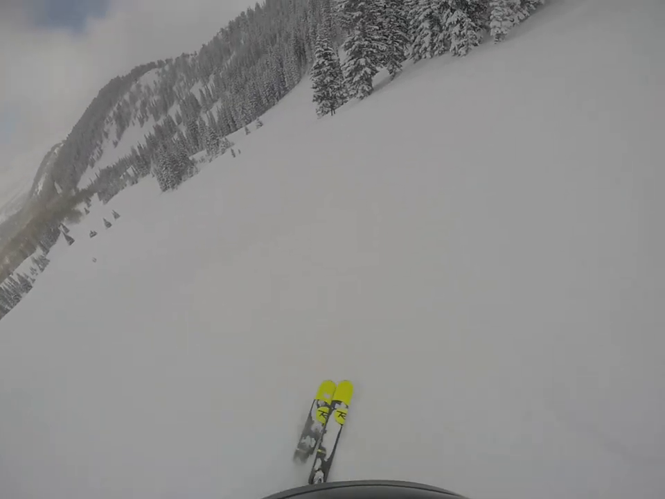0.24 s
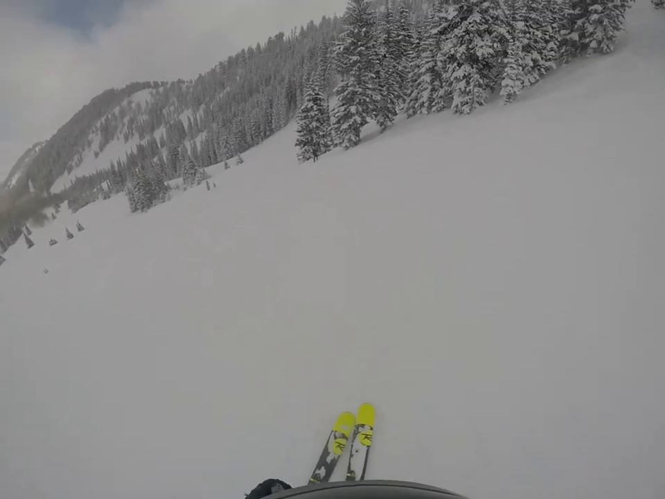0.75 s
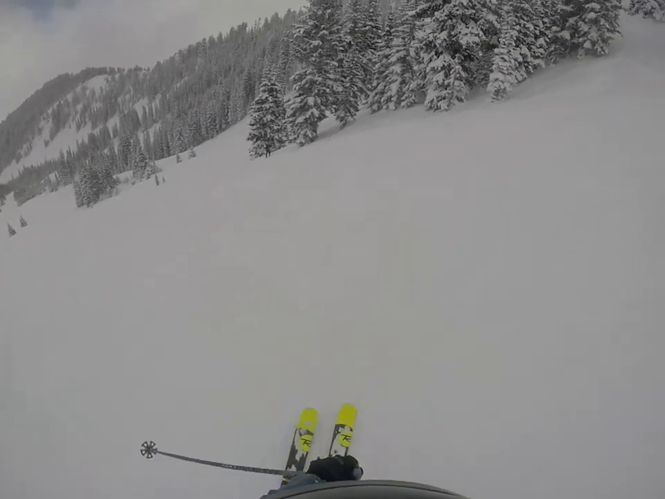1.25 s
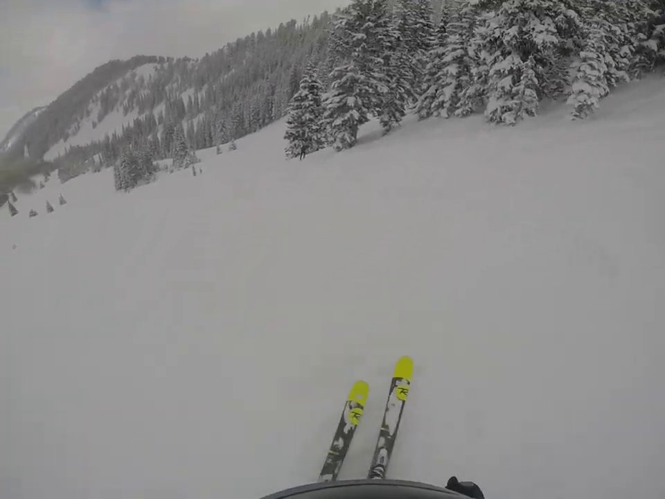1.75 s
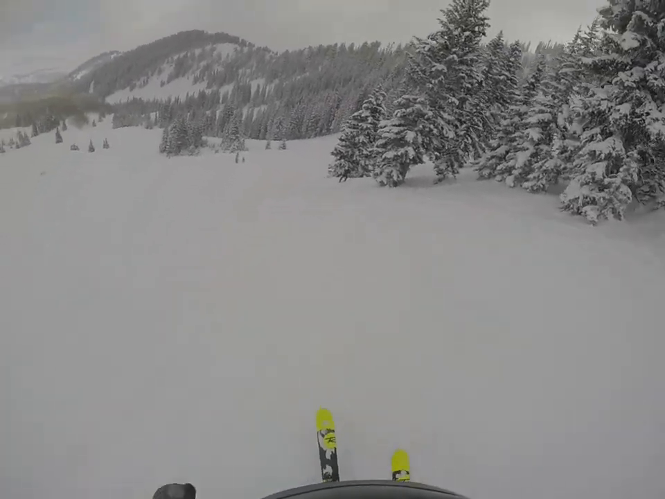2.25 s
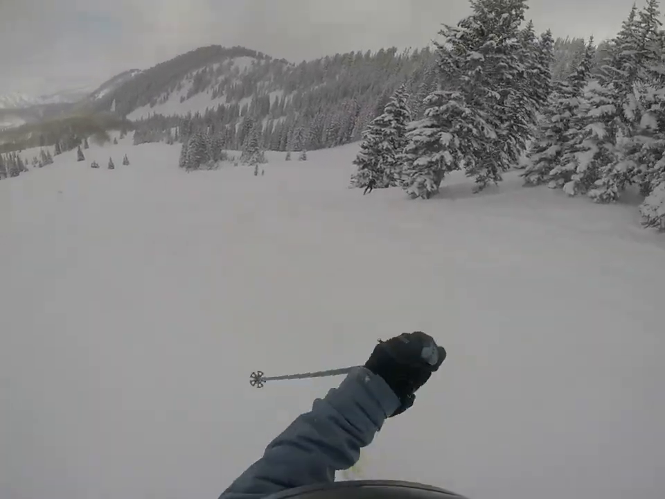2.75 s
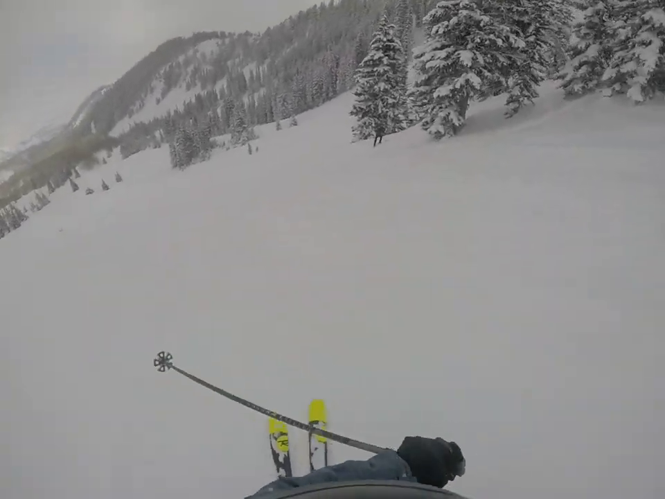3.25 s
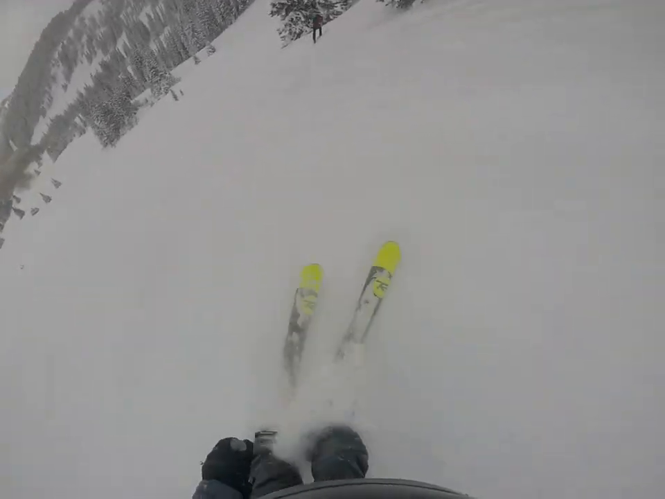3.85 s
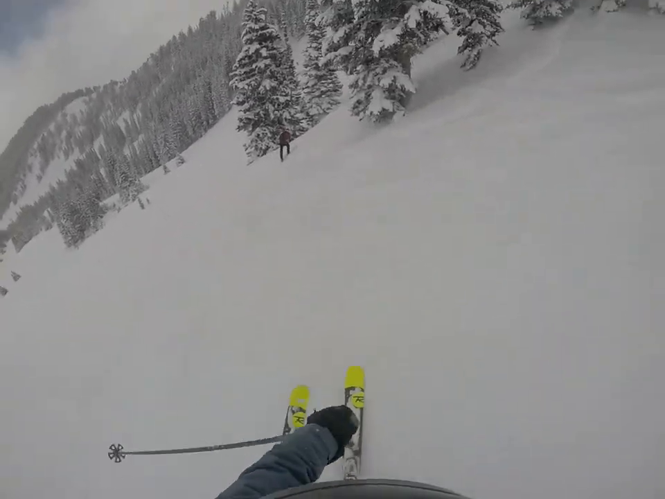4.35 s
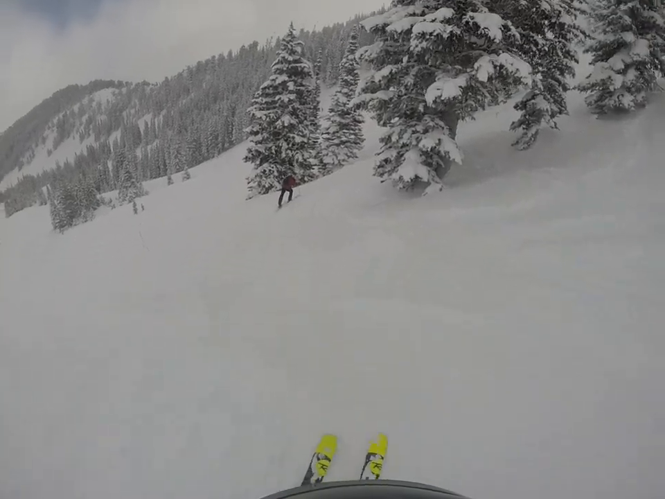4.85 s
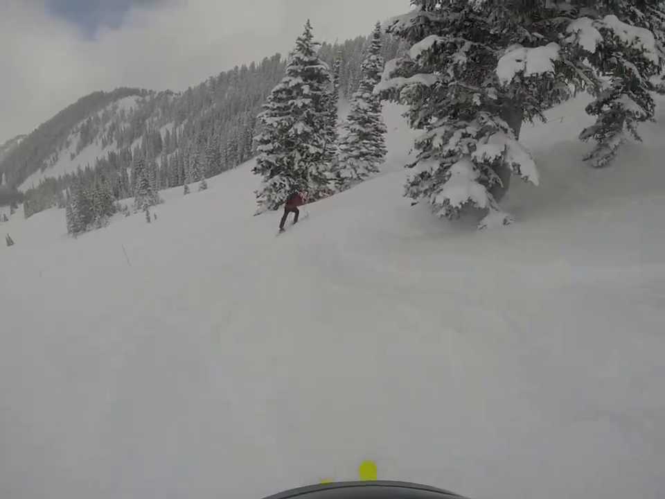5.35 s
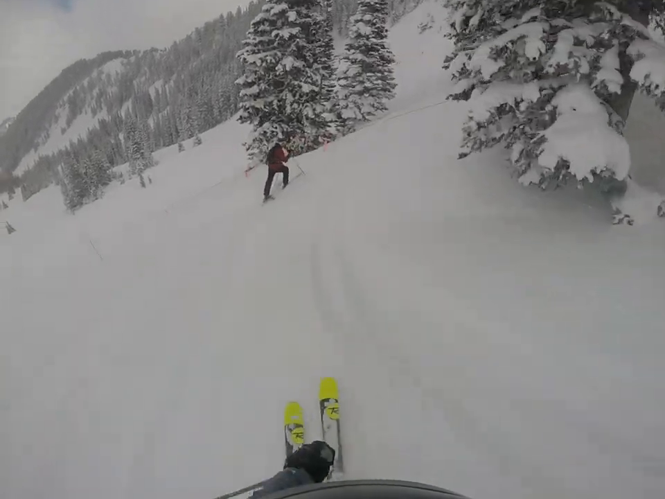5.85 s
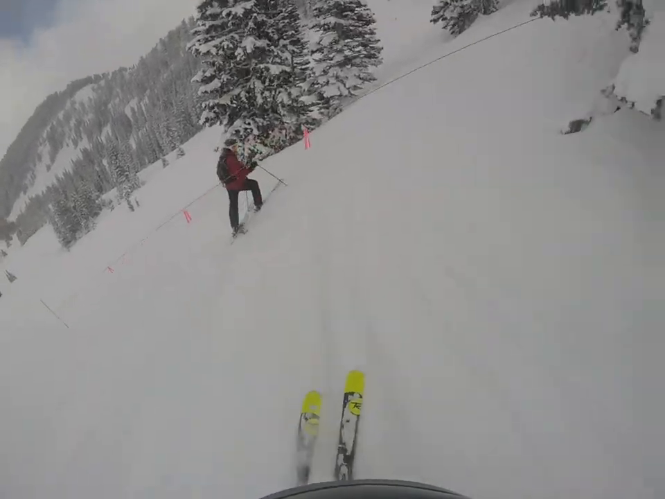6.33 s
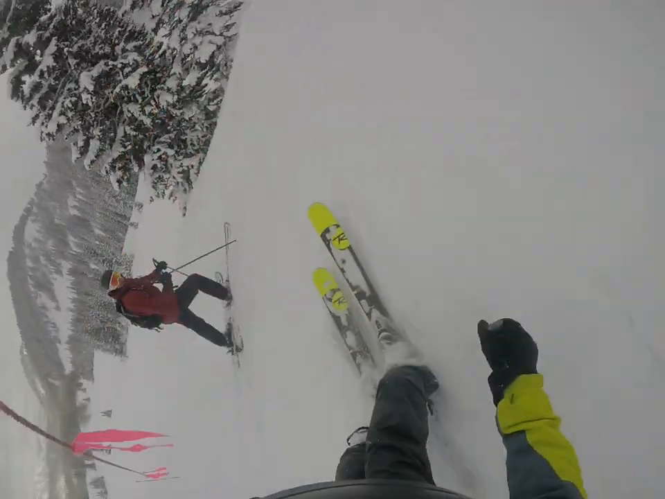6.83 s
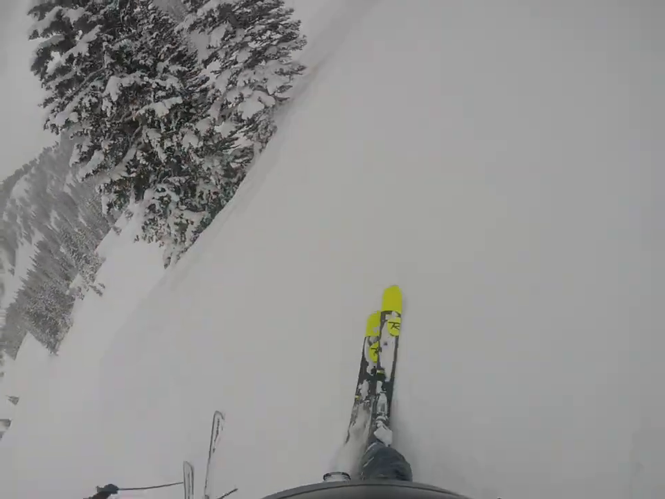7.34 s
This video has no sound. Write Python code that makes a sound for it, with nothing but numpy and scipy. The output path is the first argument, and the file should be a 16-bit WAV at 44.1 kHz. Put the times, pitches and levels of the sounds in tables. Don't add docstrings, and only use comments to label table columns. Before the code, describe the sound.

On an open snowy slope, wind heaves in slow deep thumps with a soft rush and faint hum. Over it, skis hiss through deep snow, stronger and weaker as the load changes. Tiny sharp ticks hit the microphone's case. At the end the skis fall nearly silent, a thin airy side wind appears and something loose taps. The sound is close, boxed-in and muffled.

```python
import sys
import numpy as np
from scipy import signal
from scipy.fft import rfft, irfft, next_fast_len
from scipy.io import wavfile
from scipy.ndimage import uniform_filter1d

SR = 44100
rng = np.random.default_rng(int(sys.argv[2]) if len(sys.argv) > 2 else 0)


def wrap_up_sound(samples):
    columns = np.atleast_2d(samples).T
    tamed = np.clip(columns, -1, 1)
    steps = np.round(tamed * 32767).astype(np.int16)
    wavfile.write(sys.argv[1], SR, steps)


def amplitude_ratio(level_db):
    exponent = np.asarray(level_db, float) / 20
    return 10 ** exponent


N = 334719


def rms_one(x):
    return x / np.sqrt(np.mean(x ** 2) + 1e-20)


def in_time(rows):
    s, *columns = np.transpose(rows)
    return [np.interp(np.arange(N) / SR, s, column) for column in columns]


def coloured(x, spectrum):
    size = next_fast_len(N)
    hz, db = np.transpose(spectrum)
    bin_hz = np.arange(size // 2 + 1) * SR / size
    gain = amplitude_ratio(np.interp(np.log(bin_hz + 1), np.log(hz), db, left=-120, right=-120))
    return rms_one(irfft(rfft(x, size) * gain, size)[:N])


def band(x, low_hz, high_hz, order=2):
    return signal.sosfilt(signal.butter(order, [low_hz, high_hz], "band", fs=SR, output="sos"), x)


def drift(rate_hz):
    r = np.exp(-2 * np.pi * rate_hz / SR)
    wander = signal.lfilter([1], [1, -2 * r, r * r], rng.standard_normal(N + SR))
    return rms_one(wander[SR:])


def ring(x, hz, t60):
    r, w = amplitude_ratio(-60 / (t60 * SR)), 2 * np.pi * hz / SR
    return signal.lfilter([0, np.sin(w)], [1, -2 * r * np.cos(w), r * r], x + 1e-18)


def grains(per_s, spread_db):
    sizes = amplitude_ratio(spread_db * np.minimum(rng.exponential(1, N), 5))
    signs = rng.choice([-1, 1], N)
    breaks = rng.random(N) < per_s / SR
    return rms_one(sizes * signs * breaks)


def evened(x, seconds):
    power = uniform_filter1d(x ** 2, int(seconds * SR))
    return rms_one(x / np.sqrt(power + 0.053 * np.mean(x ** 2)))


def skis():
    # time in seconds, level in dB.
    load = [(0, -42.5), (1.12, -42), (1.38, -47), (1.47, -52.5), (1.56, -50.5), (1.6, -47), (2.3, -49),
            (2.75, -45), (3.85, -44.5), (3.91, -59.5), (4.06, -65), (4.12, -56.5), (4.5, -57.5),
            (4.66, -48), (5.28, -55.5), (5.8, -47.5), (6.94, -60.5), (7.0, -67.5)]
    # middle in seconds, change in dB,
    # half length in seconds.
    rolls = [(0.33, 4.5, 0.2), (0.588, -2, 0.082), (0.82, 1.3, 0.1), (1.25, -3.5, 0.076),
             (1.573, 4.5, 0.024), (1.676, 0.5, 0.072), (1.808, -2.5, 0.09), (2.155, 0.5, .06),
             (2.72, 2, 0.064), (2.945, 3.7, 0.081), (3.314, 6.5, 0.37), (3.61, -3, 0.057),
             (3.736, 5, 0.091), (3.923, -0.5, .04), (4.12, 3, .03), (4.206, 3.5, 0.067), (4.47, -4, 0.056),
             (4.53, -0.5, 0.037), (4.858, 3.5, 0.065), (5.494, 0.5, 0.12), (5.727, 1, 0.028),
             (5.984, -6, 0.15), (6.23, 4, .14), (6.518, -2, 0.17), (6.845, 4, .04), (6.934, 0, 0.027)]
    # pitch in Hz, level in dB per Hz.
    crush_colour = [(530, -40), (900, -23.5), (1280, -19), (1650, -4), (1880, -1), (2150, -7), (2650, -9),
                    (3140, -17.5), (3480, -16), (4100, -32.5), (5330, -39), (9020, -120)]
    spray_colour = [(3200, -22), (4100, -22), (4870, 3.5), (5300, -1), (5800, 2.5), (6500, -6.5),
                    (8400, -17.5), (10900, -24), (14600, -34), (15500, -42)]
    hiss_db, = in_time(load)
    for s, change_db, half_s in rolls:
        place = np.clip((np.arange(N) / SR - s) / half_s, -1, 1)
        hiss_db = hiss_db + change_db * np.cos(np.pi / 2 * place) ** 2
    full_load_db, full_spray_db, spray_floor_db = -42.5, -62, -76
    spray_db = np.maximum(full_spray_db + 1.32 * (hiss_db - full_load_db), spray_floor_db)
    flutter = 0.4 * drift(25.0) + 0.9 * drift(70.0)
    crush = grains(per_s=9000.0, spread_db=3.0)
    fine = 0.7 * crush + grains(per_s=8000.0, spread_db=3.5)
    hiss = amplitude_ratio(hiss_db - 0.1 + 1.24 * flutter) * coloured(crush, crush_colour)
    spray = amplitude_ratio(spray_db - 2.0 + 2.0 * flutter) * coloured(fine, spray_colour)
    return hiss + spray


def eddies():
    # middle in seconds, heave level in dB, buffet level in dB, width in seconds.
    whirls = [(.06, -33.5, -55, 0.19), (.27, -50, -37, 0.1), (.41, -35.5, -35.5, 0.1),
              (.55, -35, -35, 0.043), (.76, -37.5, -32.5, 0.14), (1.01, -39, -40, 0.31),
              (1.2, -35, -50, 0.086), (1.35, -39.5, -38, 0.11), (1.58, -32, -32.5, 0.12),
              (1.74, -30.5, -34.5, 0.11), (2.08, -34.5, -40.5, 0.092), (2.4, -37, -45.5, 0.31),
              (2.62, -30, -36, 0.092), (2.88, -40, -35.5, 0.081), (3.04, -40.5, -41, 0.076),
              (3.42, -36.5, -38.5, 0.24), (3.6, -29, -42, 0.038), (3.81, -29, -32, 0.12),
              (4.06, -37, -42, 0.09), (4.3, -38, -42.5, 0.46), (4.7, -49, -45, 0.32),
              (5.03, -40.5, -42.5, 0.16), (5.4, -32.5, -41.5, 0.1), (5.75, -36, -40, 0.066),
              (6.18, -38, -45, 0.086), (6.3, -36.5, -32, 0.042), (6.45, -36, -46, .12),
              (6.8, -39.5, -55, 0.13), (7.02, -53, -40.5, 0.048), (7.22, -32, -43, 0.12)]
    heave_db, buffet_db = np.full(N, -47.5), np.full(N, -54.5)
    for s, heave_top_db, buffet_top_db, width_s in whirls:
        loss_db = 11 * np.abs(np.arange(N) / SR - s) / width_s
        heave_db = np.maximum(heave_db, heave_top_db - loss_db)
        buffet_db = np.maximum(buffet_db, buffet_top_db - loss_db)
    return heave_db, buffet_db


def wind():
    # time in seconds, level in dB.
    rush_level = [(0.0, -56.5), (1.75, -57.5), (2.2, -58.5), (3.61, -57), (4.33, -61.5), (5.54, -60),
                  (6.64, -60), (7.21, -63), (7.59, -62.5)]
    # pitch in Hz, level in dB per Hz.
    rush_colour = [(60, -36), (85, -13), (120, -14), (200, -15.5), (439, -20), (613, -22.5), (1140, -25.5),
                   (1400, -21.5), (2000, -55)]
    heave_db, buffet_db = eddies()
    white = rng.standard_normal((4, N + SR))
    heave = evened(band(white[0], 7.4, 22.5), 0.04)[SR:]
    buffet = evened(band(white[1], 27.8, 51.4, order=3), 0.072)[SR:]
    lumps = amplitude_ratio(heave_db) * heave + amplitude_ratio(buffet_db) * buffet
    lumps = signal.sosfilt(signal.butter(3, 64.0, fs=SR, output="sos"), lumps)
    rush = coloured(white[2, :N], rush_colour)
    hum_hz, hum_width_hz = 138, 9
    hum = rms_one(ring(white[3], hum_hz, 2.2 / hum_width_hz)[SR:])
    level_db, = in_time(rush_level)
    hum_db = -69 + 1.55 * (level_db - level_db.mean())
    return lumps + amplitude_ratio(level_db) * rush + amplitude_ratio(hum_db) * hum


def ticks():
    # time in seconds, energy in dB, hardness in dB.
    on_port = [(.2495, -24, 4), (.8713, -36, -9), (1.1626, -20, -5), (1.2926, -29.5, 8), (1.3748, -9, -12),
               (1.7003, -30.5, 8), (1.77, -37, 8), (1.8459, -39, 9), (2.3918, -28, 12), (2.5267, -29.5, 4),
               (2.9054, -33, -6), (3.1756, -33, 9), (3.2632, -40, 16), (3.6774, -37, 8), (3.7959, -40, 8),
               (4.6943, -29, 11), (5.2637, -39, -3), (5.6442, -18.5, -3), (5.817, -44, -8),
               (5.8903, -38, 11), (6.181, -41, -9), (6.3376, -43, 11), (6.6647, -34.5, 9),
               (6.8746, -42, 14), (7.005, -39, 1), (7.2327, -38, -8)]
    on_face = [
        (1.3728, -30, 5),
        (2.0407, -16, -8),
        (2.3737, -25.5, -1),
        (3.7363, -21, -2),
        (4.8697, -17.5, 2.5),
    ]
    on_top = [(0.6686, -24, 0), (1.8727, -25, 3), (4.9997, -19, -3), (6.9578, -34.5, 1), (1.7294, -38, 1.5),
              (4.2132, -37.5, 4)]
    on_back = [(2.1339, -30, -3), (2.1693, -20.5, 4), (2.4387, -24.5, 4), (2.446, -22, 4), (4.396, -26, -7),
               (5.2084, -22, -4), (5.2335, -27, 6), (5.423, -26, -6)]
    on_shell = [(.4456, -28, -10), (.54, -34, -1), (.8687, -42, 3), (1.147, -39, 5), (2.0438, -37, 3),
                (2.2984, -35.5, 4), (2.5934, -39.5, -1), (3.0992, -47, 10), (3.1632, -35.5, -3),
                (3.828, -36, -3), (3.9027, -38, -6), (4.0713, -52, 5), (5.7509, -47, 9),
                (5.8879, -27.5, -1), (6.5249, -47, .1), (6.5614, -45, 3), (7.3415, -44, 5)]
    on_rim = [(.0509, -44, 0), (.2236, -43, -2.6), (0.3674, -35, -4), (.5602, -42, 0), (.7942, -43, 1.5),
              (1.2301, -28, -0.5), (1.4329, -56, 5), (1.5238, -43, 1), (1.7593, -44, 1), (2.2715, -53, 3),
              (2.9425, -46, 1.5), (3.429, -43, 7), (3.4781, -43, -1), (3.5432, -44, 1.5), (3.5523, -36, -2),
              (3.58, -39, 1), (3.7403, -43, -1.5), (3.8146, -44, 0), (4.6846, -43, -3), (4.8279, -46, 0),
              (5.2443, -49, 4), (5.471, -47, -2), (6.2417, -27, 0.5), (6.31, -47, -2), (6.5487, -46, .1),
              (7.0786, -42, 5)]
    spots = on_port, on_face, on_top, on_back, on_shell, on_rim
    # case, port, shell and rim, all in dB.
    shares = [
        (-15, 1, -11, -17.5),
        (0, -6.5, -11, -5.5),
        (-5, -0.5, -3.5, -7.5),
        (-4, -12, -18, -26),
        (-5, -2.5, 3, -6),
        (-14, -3, 1.5, 1),
    ]
    # low limit in Hz, high limit in Hz, gain in dB.
    zones = [
        (2200, 3300, -1.),
        (4250, 5700, 0.),
        (5800, 7500, -2.),
        (8800, 15600, -.5),
    ]
    # dB per dB of hardness, one for each zone.
    hardness_reach = [0, 0, 0.13, 1]
    first_touch = [4, 8, 3, 1.8]
    times, blows_db = [], []
    for hits, share_db in zip(spots, shares):
        for s, energy_db, hard_db in hits:
            times.append(s)
            blows_db.append(energy_db + np.add(share_db, np.multiply(hard_db, hardness_reach)))
    times, zones_db = np.array(times), np.transpose(blows_db)
    lag = np.arange(300)
    fade = np.exp(-lag / (0.0005 * SR)) + 0.12 * np.exp(-lag / (0.003 * SR))
    crackle = rng.standard_normal((len(times), 300)) * fade
    at = ((times - 0.0002) * SR).astype(int)[:, None] + lag
    out = np.zeros(N)
    for (low_hz, high_hz, gain_db), energy_db, touch in zip(zones, zones_db, first_touch):
        crackle[:, 0] = touch
        rung = band(crackle, low_hz, high_hz, order=3)
        rung = rung / np.sqrt(np.sum(rung ** 2, axis=1, keepdims=True))
        np.add.at(out, at, rung * amplitude_ratio(energy_db + gain_db)[:, None])
    return out


def side_wind():
    # time in seconds, level in dB.
    blowing = [(0, -95), (6.75, -90), (6.95, -77), (7.01, -70), (7.06, -71), (7.25, -71), (7.4, -83),
               (7.59, -73)]
    # pitch in Hz, level in dB per Hz.
    port_colour = [(4000, -14), (4550, -8), (4850, 3), (5200, -5), (7500, -16), (9500, -9), (11000, -25),
                   (13000, -33)]
    level_db, = in_time(blowing)
    return amplitude_ratio(level_db) * coloured(rng.standard_normal(N), port_colour)


def knocks():
    # time in seconds, peak level in dB.
    taps = [
        (7.388, -35),
        (7.416, -49),
    ]
    # pitch in Hz, level in dB, seconds to fall by 60 dB.
    tones = [(1530, -2.5, 0.013), (1770, -1.5, 0.0056), (2070, -9, 0.0073), (2700, -11, 0.0068),
             (3340, -4.5, 0.0043), (4700, -3, 0.0041), (5700, -21, 0.0033)]
    out, lag = np.zeros(N), np.arange(200)
    rattles = rng.standard_normal((len(taps), 200))
    rattles[:, 0] = 3.0
    for hz, level_db, t60 in tones:
        fall_per_s = 1 / 0.0045 + (hz / 4800) ** 2 / 0.0022
        fade = np.exp(-lag / SR * fall_per_s)
        push = np.zeros(N)
        for (s, db), rattle in zip(taps, rattles):
            push[int((s - 0.0012) * SR) + lag] = amplitude_ratio(db + level_db - 15.0) * rattle * fade
        out += ring(push, hz, t60)
    return band(out, 1580.0, 5800.0, order=4)


def scene():
    return (skis() + wind() + ticks() + knocks() + side_wind())[None]


def band_limit(x):
    return signal.sosfilt(signal.butter(12, 16500, fs=SR, output="sos"), x)


def record(dry):
    # pitch in Hz, level in dB per Hz.
    noise_colour = [(530, -2), (900, -9.5), (3000, 0), (3900, -4.5), (4500, -4), (4860, -4), (5300, -9),
                    (9500, -13), (12800, -19), (15000, -20), (15400, -40)]
    hiss = amplitude_ratio(-67.5) * coloured(rng.standard_normal(N), noise_colour)
    top_cut = signal.cheby2(10, 50, 16500, fs=SR, output="sos")
    mix = signal.sosfilt(top_cut, dry + hiss)
    return band_limit(mix)


dry = scene()
out = record(dry)
wrap_up_sound(out)
```